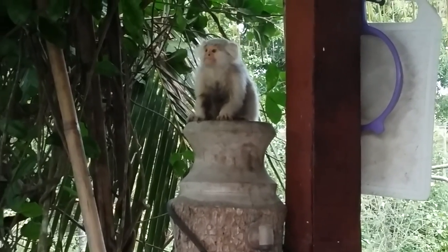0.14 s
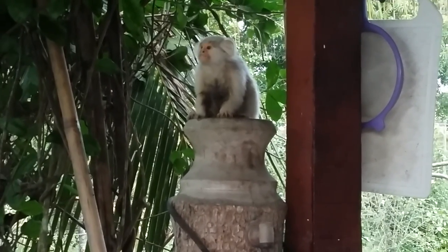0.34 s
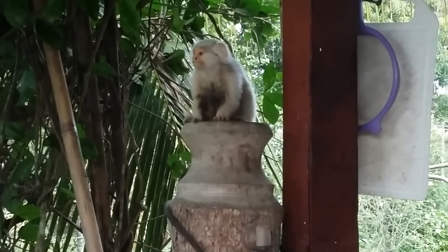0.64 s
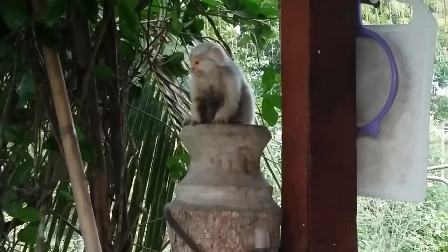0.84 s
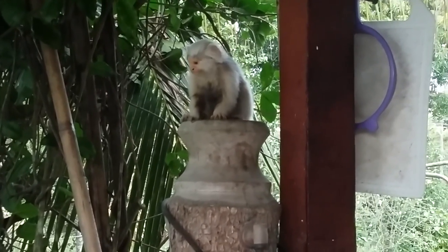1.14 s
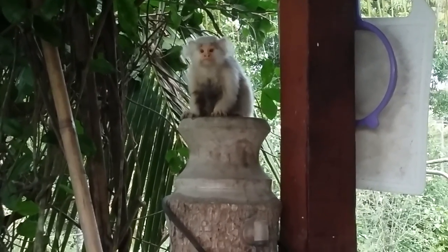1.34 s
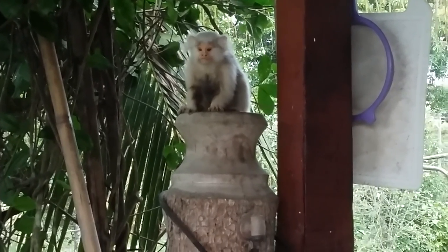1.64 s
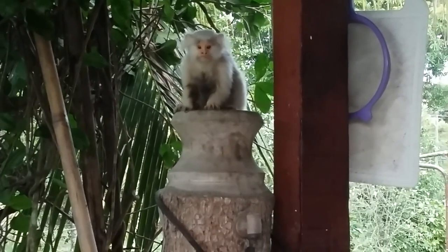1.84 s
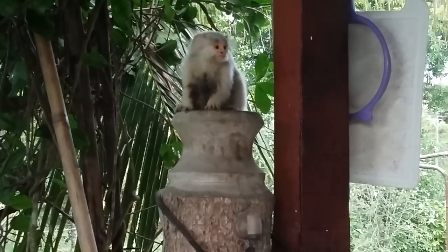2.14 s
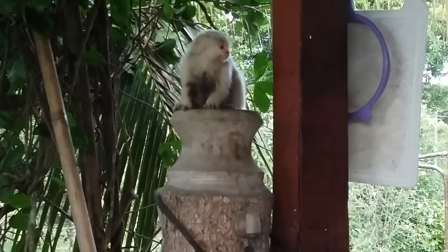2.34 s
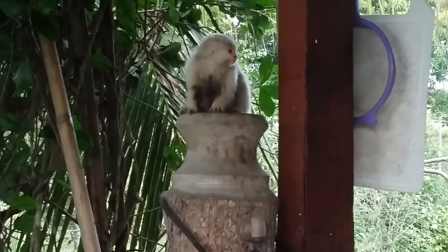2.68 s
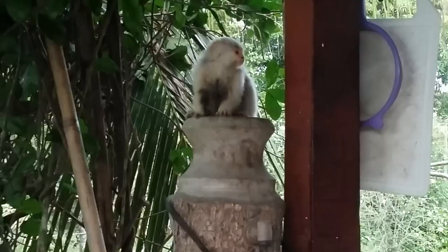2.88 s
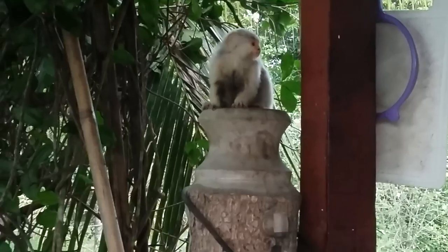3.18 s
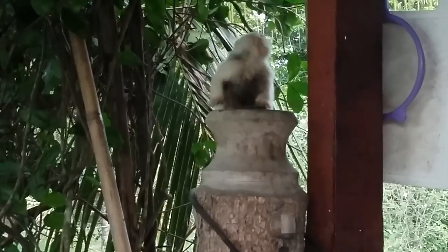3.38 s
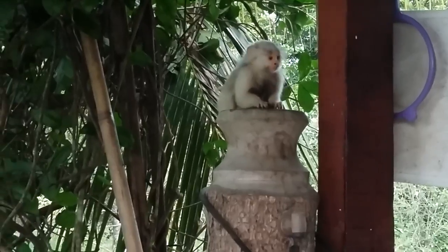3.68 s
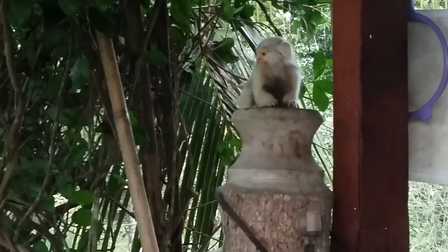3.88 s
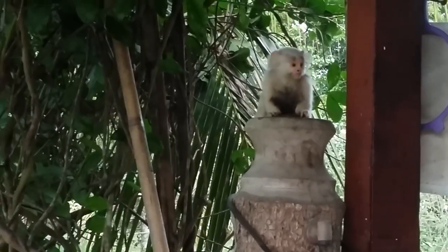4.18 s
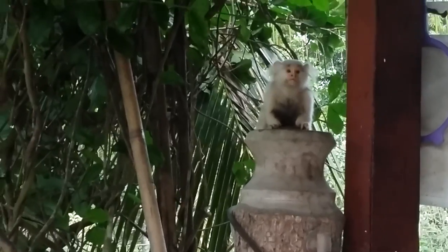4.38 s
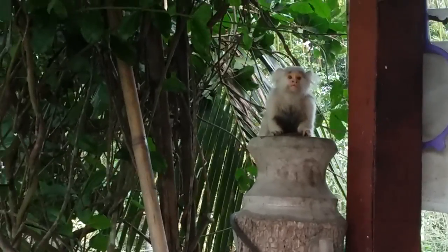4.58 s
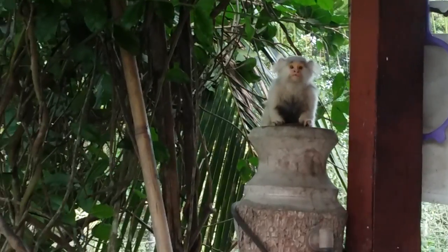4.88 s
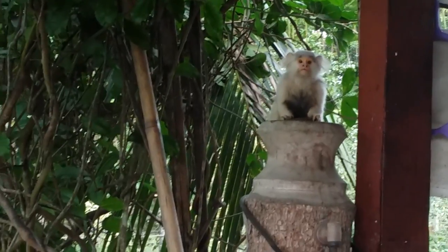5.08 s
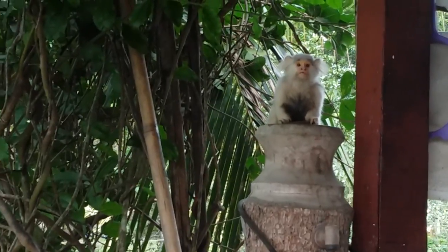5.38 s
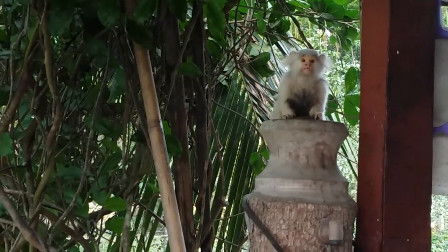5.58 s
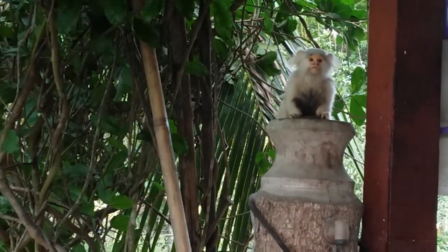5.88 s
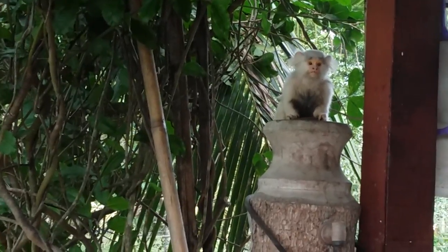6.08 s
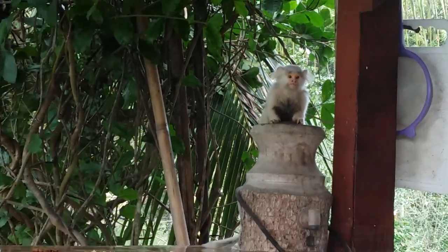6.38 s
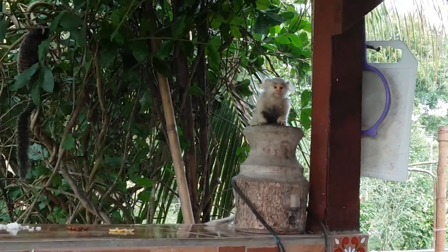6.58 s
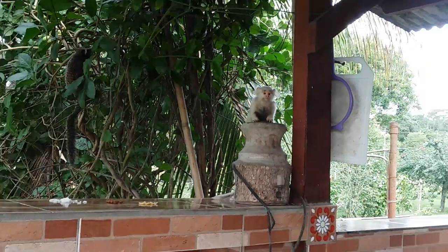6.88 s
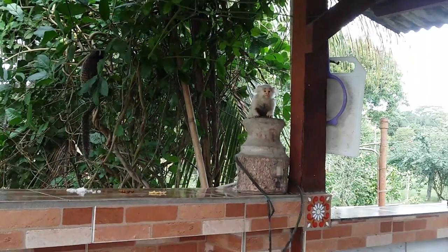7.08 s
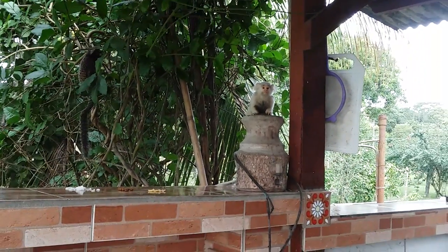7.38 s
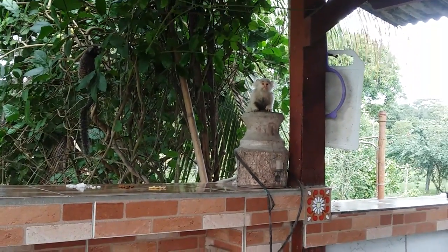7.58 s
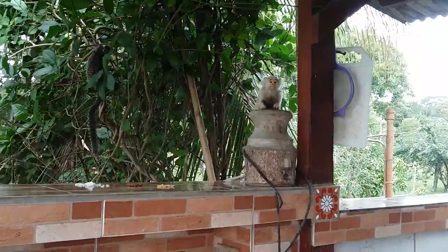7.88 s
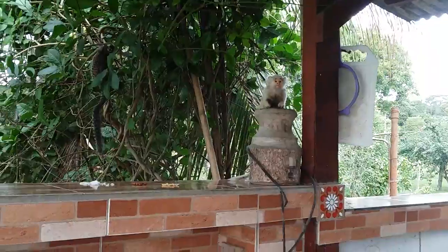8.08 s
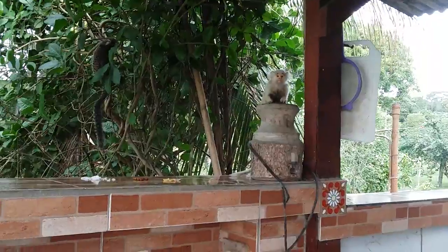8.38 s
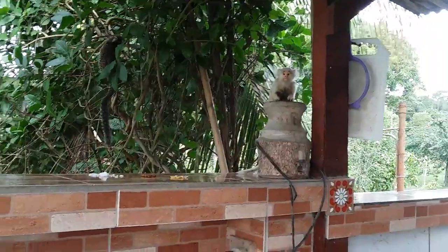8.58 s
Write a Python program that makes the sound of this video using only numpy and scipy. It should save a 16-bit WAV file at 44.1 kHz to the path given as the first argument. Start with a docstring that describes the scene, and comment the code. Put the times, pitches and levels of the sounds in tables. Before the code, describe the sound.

Five clear falling bird whistles ring out close by in a leafy garden, with distant trills, thin monkey cries and a low drifting machine hum.

```python
"""Leafy garden, calling birds.

A near caller gives five falling whistles: sagging sine glides with faint overtones.
Far birds sing trills and a seesaw song, a small monkey cries thinly: sines along pitch breakpoints.
Every call is convolved with a noise tail, the scatter from trees and walls.
Below: a drifting machine hum, a slower wavering engine, filtered-noise rumble, hiss, leaves and insects;
the microphone adds its own steady treble noise.
"""
import sys
import numpy as np
from scipy import signal
from scipy.fft import rfft, irfft, next_fast_len
from scipy.io import wavfile
from scipy.ndimage import uniform_filter1d

SR = 44100
rng = np.random.default_rng(int(sys.argv[2]) if len(sys.argv) > 2 else 0)


def to_wav(s):
    """Save 16-bit WAV."""
    ch = np.atleast_2d(s).T  # columns
    pcm = np.round(np.clip(ch, -1, 1) * 32767)  # PCM
    wavfile.write(sys.argv[1], SR, pcm.astype(np.int16))


N = 385434

# Air levels, before fixed trims: start_s, rumble_db, hiss_db
AIR_LEVELS = [(0.0, -58, -59.5), (0.61, -55, -58.5), (1.38, -55, -60), (2.8, -53.5, -59.5),
              (4.26, -53, -59.5), (6.96, -61.5, -63), (8.74, -60, -63.5)]
# Noise spectra, relative: freq_hz, density_db_per_hz
RUMBLE_SPECTRUM = [(65, -33.5), (110, -8.5), (119, -4), (178, -9), (265, -7), (335, -16.5), (398, -20.5),
                   (600, -39.5), (780, -66), (1320, -120)]
HISS_SPECTRUM = [(250, -32.5), (390, 0), (580, -4.5), (1200, -4), (1500, -6), (2900, -8), (3600, -17.5),
                 (4500, -23), (6000, -28.5), (7400, -44), (8200, -54.5)]
# Microphone self-noise spectrum, relative: freq_hz, density_db_per_hz
SELF_NOISE_SPECTRUM = [(4000, -16.5), (7000, -4), (8200, -3.5), (11000, 0.5), (15700, 1), (17000, 9)]
DEEP_DB, SELF_NOISE_DB = -54.5, -79.5
# Faint throbbing insect bands: centre_hz, width_hz, level_db, throb_rate_hz
INSECT_BANDS = [(7040, 220, -90, 9.), (4840, 130, -103.5, 6.6)]
# Leaf shakes: start_s, level_db, fade_db_per_s
LEAF_SHAKES = [(3.14, -59, 20), (4.33, -64, 14.5)]
LEAVES_DB, LEAVES_FADE_DB_PER_S, SHAKE_RISE_S = -73.5, 2.8, 0.017

# Machine hum, before drift: time_s, pitch_hz, level_db
HUM_TRACK = [(0.0, 87.93, -30), (2.65, 87.8, -33.5), (3.75, 87.5, -32), (4.5, 86.97, -37),
             (4.77, 90.64, -43), (4.92, 90, -63), (5.01, 92, -37.5), (5.14, 89.63, -46), (6.28, 87.67, -40),
             (7.23, 88.96, -54.5), (7.52, 88.66, -44), (8.74, 87.3, -45.5)]
# Neighbours beating with the hum, before drift: pitch_hz, level_db
SIDE_TONES_HZ_DB = [(93.5, -53.5), (103, -54.5)]
HUM_OCTAVE_DB = -61
ENGINE_HZ, ENGINE_SAG_HZ_PER_S, ENGINE_DB = 47.3, .9, -44.5
NEAREST_S, PASS_S, STOP_S = 3.7, 1.51, 7.55
SURGE_AT_S, SURGE_EVERY_S, SURGE_HZ, SURGE_DB = 3.68, .98, 4, 3

# Rustles and taps close by: start_s, start_level_db, t60_s, low_hz, high_hz
RUSTLE_BURSTS = [(1.79, -79, 0.54, 4000, 15200), (3.142, -61, 0.3, 2960, 7200),
                 (3.145, -75, 0.59, 7000, 15000), (3.339, -59, 0.25, 4000, 7500),
                 (4.319, -68, .5, 1505, 15120), (4.39, -68, .5, 4000, 15500),
                 (6.172, -54, 0.044, 2480, 5400), (6.933, -56.5, 0.089, 2520, 6100),
                 (8.43, -52.5, 1, 497, 2950), (8.509, -73, 0.18, 5000, 15000)]

# Note shapes: offset_s, pitch_ratio, level_db
CHIP_SHAPE = [(0, .98, -20), (.003, 1.0, -4), (.009, .9, -1), (.017, .82, 0), (.022, .75, -25)]
ARCH_SHAPE = [(0, .86, -20), (.006, .91, -4), (.022, 1.0, 0), (.032, .96, 0), (.043, .79, -1),
              (.053, .97, -2), (.06, 1.0, -25)]
WARBLE_SHAPE = [(0, .9, -16), (.008, .97, -5), (.02, 1.03, 0), (.045, 1.01, -1), (.065, .96, -5),
                (.078, .9, -20)]
DIP_SHAPE = [(0, 1.32, -10), (.008, 1.22, -4), (.018, 1.04, -3), (.032, .9, -1), (.055, .97, 0),
             (.085, 1.05, -3), (.105, 1.02, -20)]
CRY_SHAPE = [(0, .995, -20), (.015, 1.0, -2), (.035, 1.01, 0), (.05, 1.05, -3), (.058, 1.1, -16),
             (.066, 1.14, -16), (.085, 1.15, -30)]
PEEP_SHAPE = [(0, 1.015, -20), (.015, 1.01, 0), (.06, .99, 0), (.08, .985, -25)]
TICK_SHAPE = [(0, 1.0, -20), (.004, 1.0, 0), (.011, .99, 0), (.016, .92, -3), (.024, .77, -4),
              (.028, .75, -25)]
# Single notes, before scatter: start_s, pitch_hz, level_db
LONE_ARCHES = [(1.171, 2626, -55.5), (1.233, 2607, -54), (6.12, 2840, -60), (6.831, 2985, -62.5),
               (7.009, 3300, -78), (7.25, 3120, -66), (7.45, 3170, -68), (7.619, 3085, -61),
               (8.4, 2508, -56), (8.48, 2520, -57)]
LONE_WARBLES = [(3.769, 6250, -68.5), (4.81, 6120, -73), (8.4, 5980, -70), (8.499, 5960, -68)]
CRY_NOTES = [(1.126, 7050, -61.5), (2.276, 7140, -61), (2.664, 7070, -57.5), (6.988, 7210, -60.5),
             (7.955, 7240, -58), (8.325, 7090, -69)]
PEEP_NOTES = [(.08, 5080, -70.5), (4.22, 5130, -66), (4.38, 2870, -61), (5.16, 5950, -78),
              (7.449, 1206, -68), (7.75, 1143, -65), (8.65, 5590, -72)]
TICK_NOTES = [(5.505, 6360, -57), (5.571, 5860, -52.5)]
# Two trills of chip + arch syllables, before scatter: start_s, chip_hz, arch_hz, arch_level_db
TRILL_SYLLABLES = [
    [(.465, 3500, 2820, -49), (.58, 3660, 2644, -50), (.695, 3720, 2805, -48.5), (.805, 3730, 3040, -47),
     (.92, 4150, 3020, -48), (1.03, 4050, 2970, -48)],
    [(7.73, 3890, 2857, -58.5), (7.846, 3706, 2950, -52.5), (7.96, 3770, 2980, -51),
     (8.065, 3980, 3030, -50.5), (8.181, 3842, 2920, -51), (8.295, 3910, 2975, -50.5)],
]
# One value per trill: direct sound level_db; chip level_db over arch
TRILL_DIRECT_DB = [-3.5, -4]
TRILL_CHIP_DB = [1.5, 3]
ARCH_AFTER_S = .039
PITCH_JITTER = .025  # share of pitch, per breakpoint
# Seesaw song of warble + dip, before scatter: start_s, warble_hz, warble_level_db
SEESAW_SYLLABLES = [(4.485, 4390, -49.5), (4.689, 4430, -47), (4.9, 4280, -46.5), (5.112, 4384, -45.5),
                    (5.32, 4365, -46)]
DIP_AFTER_S, DIP_HZ, DIP_UNDER_DB = 0.077, 2982, 2.5
# One swelling, rising far chirp, before scatter: time_s, pitch_hz, level_db
SWELL_TRACK = [(0.119, 3930, -75), (.24, 4210, -63), (.38, 4550, -58), (.44, 4580, -81)]

# Near whistles, before scatter: start_s, end_s, scoop_s, top_hz, rest_hz (before slide), sag_s,
# attack_s, hold_s, fade_db_per_s, level_db, octave_db (relative to the note)
WHISTLE_CALLS = [(1.335, 1.64, 0, 2510, 2073, 0.17, 0.059, 0.07, 100.5, -41, -27),
                 (1.747, 2.01, 0.0068, 3770, 2240, 0.04, 0.05, 0.041, 120, -31, -37),
                 (2.088, 2.371, 0.00032, 3663, 2896, .15, 0.072, 0.051, 45.5, -32, -37),
                 (2.628, 2.88, .07, 2103, 1843, .18, .06, 0.014, 100, -40, -35),
                 (2.949, 3.221, 0.053, 2887, 2436, 0.14, 0.076, 0.018, 66, -32.5, -38.5)]
SCOOP_HZ_PER_S, SLIDE_HZ_PER_S = 5400, 1300  # slide: steady fall on top of the sag
ONSET_DB, RELEASE_S, RELEASE_DB, TWELFTH_DB = -30, .025, -30, -50

# Scatter tails: first_fade_db_per_s, until_s, extra_fade_db_per_s, late_db, late_fade_db_per_s
NEAR_SCATTER = (80, .1, 200, -18, 42)
FAR_SCATTER = (3.5, 0.11, 129.5, -11.5, 61)
SONG_SCATTER = (0, .04, 130, -11, 55)
TRILL_SCATTER = (0, .015, 190, -13, 50)

CUTOFF_HZ = 15700


def from_db(db):
    """Decibels to amplitude ratio."""
    return 10 ** (np.asarray(db) / 20)


def rms_one(x):
    """Scale to rms 1."""
    return x / np.sqrt(np.mean(x ** 2) + 1e-20)


def in_time(rows):
    """Interpolate each column over the first (time_s), one value per sample."""
    time_s, *columns = np.transpose(rows)
    return [np.interp(np.arange(N) / SR, time_s, column) for column in columns]


def drift(rate_hz):
    """Slow random drift, spread 1: two-pole low-passed noise, one point per 40 samples."""
    pole = np.exp(-80 * np.pi * rate_hz / SR)
    noise = rng.standard_normal(N // 40 + 4002)
    slow = signal.lfilter([1], [1, -2 * pole, pole * pole], noise)[4000:]  # drop settling
    return np.interp(np.arange(N) / 40, np.arange(len(slow)), rms_one(slow - slow.mean()))


def band(x, low_hz, high_hz):
    """Butterworth band-pass."""
    return signal.sosfilt(signal.butter(2, [low_hz, high_hz], "band", fs=SR, output="sos"), x)


def steep_band_noise(samples, low_hz, high_hz):
    """White noise band-passed twice; rms 1."""
    once = band(rng.standard_normal(samples), low_hz, high_hz)
    return rms_one(band(once, low_hz, high_hz))


def coloured(spectrum):
    """Noise shaped to a spectrum on a log frequency axis; rms 1."""
    hz, db = np.transpose(spectrum)
    size = next_fast_len(N)
    log_hz = np.log(np.fft.rfftfreq(size, 1 / SR) + 1)
    shape_db = np.interp(log_hz, np.log(hz), db, left=-90, right=-90)
    return rms_one(irfft(rfft(rng.standard_normal(size)) * from_db(shape_db), size)[:N])


def tone(hz, db):
    """Sine following pitch and rms level, random start phase."""
    phase = 2 * np.pi * np.cumsum(hz) / SR + rng.uniform(0, 2 * np.pi)
    return np.sqrt(2) * from_db(db) * np.sin(phase)


def add_note(out, rows, vibrato=0., vibrato_hz=0., overtones_db=()):
    """Add one whistled note: a gliding sine with overtones, from rows of time_s, pitch_hz, level_db."""
    time_s, hz, db = np.transpose(rows)
    at = np.arange(int(time_s[0] * SR), min(int(time_s[-1] * SR), N))
    t = at / SR
    hz, db = np.interp(t, time_s, hz), np.interp(t, time_s, db)
    hz = uniform_filter1d(hz, size=200) * (1 + vibrato * np.sin(2 * np.pi * vibrato_hz * t))
    # overtones come in later than the note
    before_peak = np.arange(len(db)) < np.argmax(db)
    effort_db = (db - db.max()) * before_peak
    out[at] += tone(hz, db)
    for k, overtone_db in enumerate(overtones_db):
        out[at] += tone((k + 2) * hz, db + effort_db + overtone_db)


def notes(shape, table, vibrato=0., vibrato_hz=0., jitter=0.):
    """Sing one shape at each row's pitch and level; jitter shifts each pitch breakpoint."""
    out = np.zeros(N)
    for start_s, hz, db in table:
        rows = np.array(shape) * [1, hz, 1] + [start_s, 0, db]
        rows[:, 1] *= 1 + jitter * rng.standard_normal(len(rows))
        add_note(out, rows, vibrato, vibrato_hz)
    return out


def garden(x, direct_db, scatter):
    """Leaves, trunks and walls scatter a dense, lumpy tail: convolution with fading noise."""
    first_db, until_s, extra_db, late_db, late_fade_db = scatter
    t = np.arange(int(.7 * SR)) / SR
    clumps_db = 2.5 * drift(60)[:len(t)]
    early = from_db(-first_db * t - extra_db * np.maximum(t - until_s, 0))
    late = from_db(late_db - late_fade_db * t)
    tail = rng.standard_normal(len(t)) * (early + late) * from_db(clumps_db)
    tail = tail / np.sqrt(np.sum(tail ** 2))  # unit energy
    return from_db(direct_db) * x + signal.fftconvolve(x, tail)[:len(x)]


def leaves():
    """Leaf hiss: a fading, fluttering noise band with two shakes."""
    t = np.arange(N) / SR
    level = from_db(LEAVES_DB - LEAVES_FADE_DB_PER_S * t)
    for start_s, db, fade_db in LEAF_SHAKES:
        rise = np.clip((t - start_s) / SHAKE_RISE_S, 0, 1)
        level += from_db(db - fade_db * np.abs(t - start_s)) * rise
    return level * from_db(2.4 * drift(10.0)) * steep_band_noise(N, 2600, 6100)


def insects():
    """Narrow noise bands that throb irregularly."""
    out = np.zeros(N)
    for hz, width_hz, db, throb_hz in INSECT_BANDS:
        noise = band(rng.standard_normal(N), hz - width_hz / 2, hz + width_hz / 2)
        out += from_db(db + 3.2 * drift(throb_hz)) * rms_one(noise)
    return out


def air():
    """Rumble, hiss and the microphone's own steady treble noise, plus leaves and insects."""
    rumble_db, hiss_db = in_time(AIR_LEVELS)
    out = from_db(DEEP_DB) * steep_band_noise(N, 47, 115)
    out += from_db(rumble_db + 4.0) * coloured(RUMBLE_SPECTRUM)
    out += from_db(hiss_db + 4.5 + 1.2 * drift(4.6)) * coloured(HISS_SPECTRUM)
    out += from_db(SELF_NOISE_DB) * coloured(SELF_NOISE_SPECTRUM)
    return out + leaves() + insects()


def engine():
    """Wavering low sine, loudest and most uneven as it passes."""
    t = np.arange(N) / SR
    near = 1 / (1 + ((t - NEAREST_S) / PASS_S) ** 2)
    surge = near * np.cos(2 * np.pi * (t - SURGE_AT_S) / SURGE_EVERY_S)
    hz = ENGINE_HZ - ENGINE_SAG_HZ_PER_S * (t - NEAREST_S) + SURGE_HZ * surge
    stop = np.clip((STOP_S - t) * 10, 0, 1)
    return near * stop * tone(hz, ENGINE_DB + SURGE_DB * surge + 2.6 * drift(6.3))


def machines():
    """Drifting hum with its octave and beating neighbours, plus the engine."""
    hz, db = in_time(HUM_TRACK)
    hz = hz + .5 * drift(1.45)
    out = tone(hz, db + 1.62 * drift(0.99))
    out += tone(2 * hz, HUM_OCTAVE_DB + 3.7 * drift(2.5))
    for side_hz, side_db in SIDE_TONES_HZ_DB:
        out += tone(side_hz + 0.29 * drift(0.66), side_db + 3.0 * drift(0.86))
    return out + engine()


def rustles():
    """Leaf rustles and taps: band-passed noise bursts with exponential decay."""
    out, t = np.zeros(N + SR), np.arange(SR // 2) / SR
    for start_s, db, t60_s, low_hz, high_hz in RUSTLE_BURSTS:
        burst = steep_band_noise(len(t), low_hz, high_hz)
        level = from_db(db - 60 * t / t60_s) * np.minimum(t / 0.00099, 1)
        out[int(start_s * SR):][:len(t)] += burst * level
    return out[:N]


def trills():
    """Quick runs of falling chip and wavy arch, plus lone arches."""
    out = garden(notes(ARCH_SHAPE, LONE_ARCHES, jitter=PITCH_JITTER), -5, TRILL_SCATTER)
    for rows, direct_db, chip_db in zip(TRILL_SYLLABLES, TRILL_DIRECT_DB, TRILL_CHIP_DB):
        chip_rows = [(s, hz, db + chip_db) for s, hz, _, db in rows]
        arch_rows = [(s + ARCH_AFTER_S, hz, db) for s, _, hz, db in rows]
        chips = notes(CHIP_SHAPE, chip_rows, jitter=PITCH_JITTER)
        arches = notes(ARCH_SHAPE, arch_rows, jitter=PITCH_JITTER)
        out += garden(chips, direct_db - 4, SONG_SCATTER)
        out += garden(arches, direct_db, TRILL_SCATTER)
    return out


def seesaw_song():
    """Warble-dip pairs, lone warbles and a swelling chirp, roughened by fast vibrato."""
    dips = [(s + DIP_AFTER_S, DIP_HZ, db - DIP_UNDER_DB) for s, _, db in SEESAW_SYLLABLES]
    song = notes(WARBLE_SHAPE, SEESAW_SYLLABLES + LONE_WARBLES, vibrato=.055, vibrato_hz=75)
    song += notes(DIP_SHAPE, dips, vibrato=.06, vibrato_hz=90, jitter=PITCH_JITTER)
    add_note(song, SWELL_TRACK, vibrato=.07, vibrato_hz=45)
    return garden(song, -7, SONG_SCATTER)


def thin_calls():
    """Rising cries, peeps and ticks: bare gliding sines."""
    thin = notes(CRY_SHAPE, CRY_NOTES) + notes(PEEP_SHAPE, PEEP_NOTES)
    thin += notes(TICK_SHAPE, TICK_NOTES)
    return garden(thin, -7, FAR_SCATTER)


def far_calls():
    """All far callers, with more tail than direct sound."""
    return trills() + seesaw_song() + thin_calls()


def whistles():
    """Near, almost pure glides sagging towards a resting pitch; each call draws its own scatter."""
    out = np.zeros(N)
    for (start_s, end_s, scoop_s, top_hz, rest_hz, sag_s,
         attack_s, hold_s, fade_db, peak_db, octave_db) in WHISTLE_CALLS:
        t = np.linspace(0, end_s - start_s, 100)
        rising_hz = top_hz - SCOOP_HZ_PER_S * (scoop_s - t)
        sag_hz = (top_hz - rest_hz) * np.exp((scoop_s - t) / sag_s)
        falling_hz = rest_hz + sag_hz - SLIDE_HZ_PER_S * (t - scoop_s)
        hz = np.where(t < scoop_s, rising_hz, falling_hz)
        db = peak_db + ONSET_DB * np.maximum(1 - t / attack_s, 0) ** 2
        db = db - fade_db * np.maximum(t - attack_s - hold_s, 0)
        db = db + RELEASE_DB * np.maximum(1 - (end_s - start_s - t) / RELEASE_S, 0)
        call = np.zeros(N)
        add_note(call, np.transpose([start_s + t, hz, db]), overtones_db=(octave_db, TWELFTH_DB))
        out += garden(call, -4, NEAR_SCATTER)
    return out


def scene():
    """Sum of all layers, one channel."""
    return (air() + machines() + rustles() + far_calls() + whistles())[None]


def record(dry):
    """The microphone loses the deepest bass; the top is cut."""
    dry = signal.sosfilt(signal.butter(4, 38, "high", fs=SR, output="sos"), dry)
    return signal.sosfilt(signal.ellip(12, .5, 70, CUTOFF_HZ, fs=SR, output="sos"), dry)


dry = scene()
out = record(dry)
to_wav(out)
```